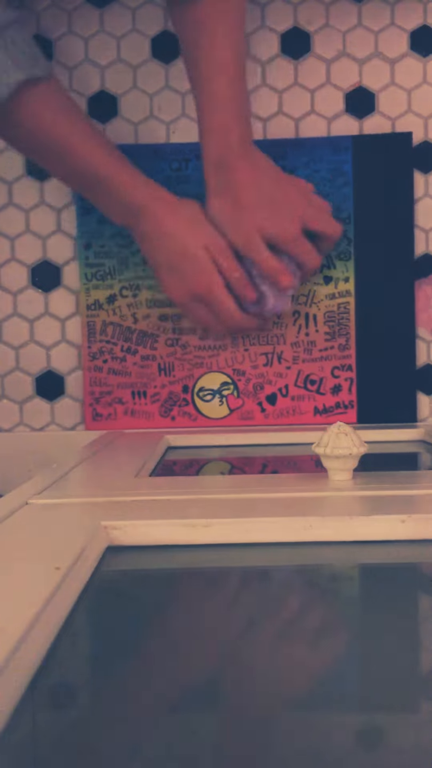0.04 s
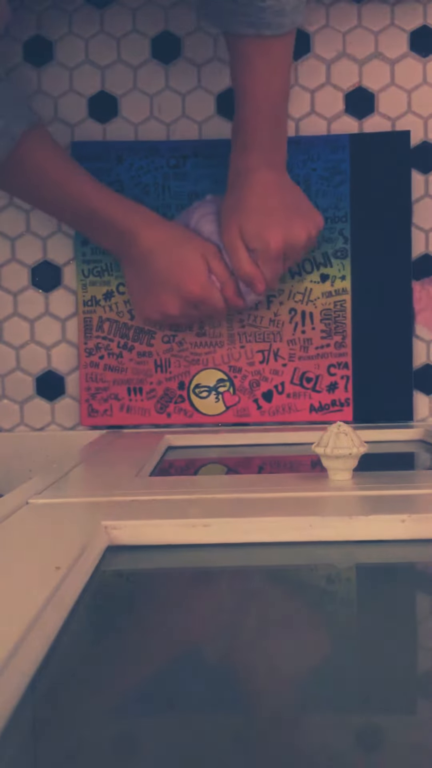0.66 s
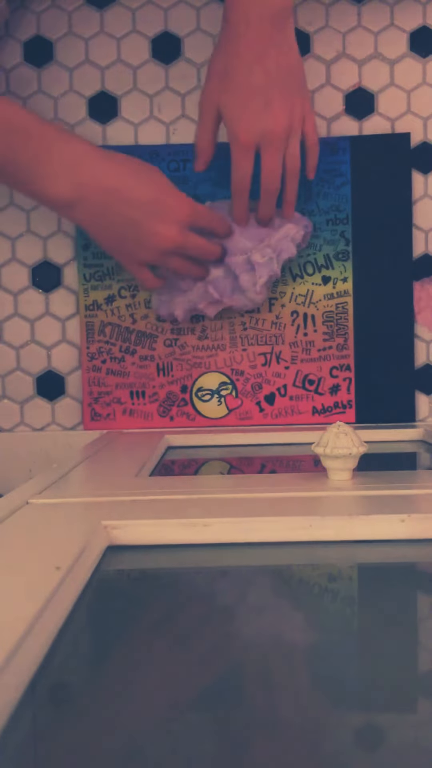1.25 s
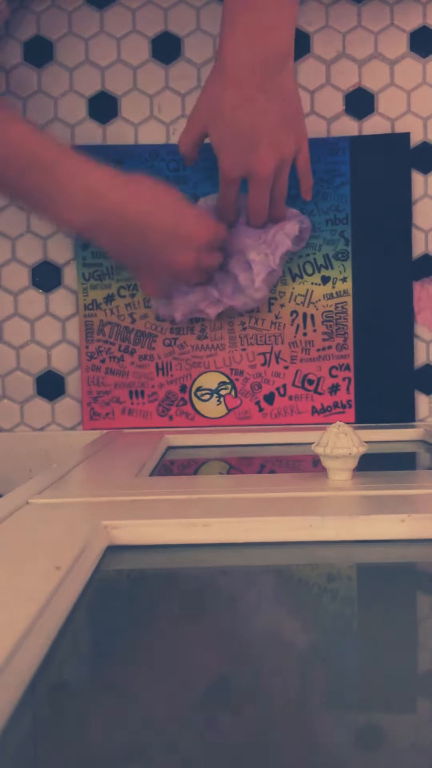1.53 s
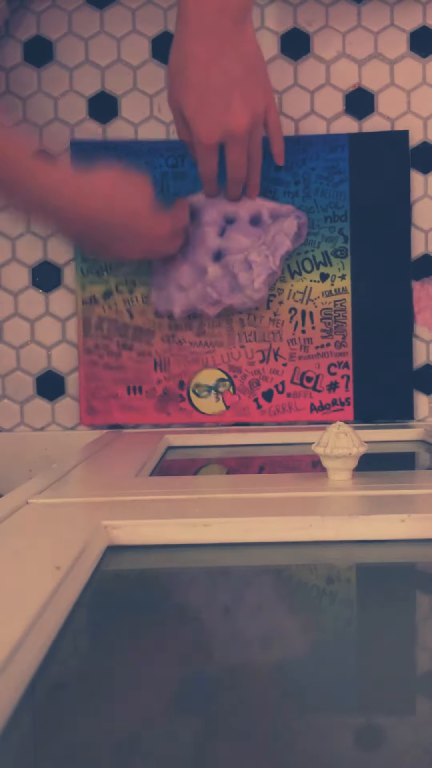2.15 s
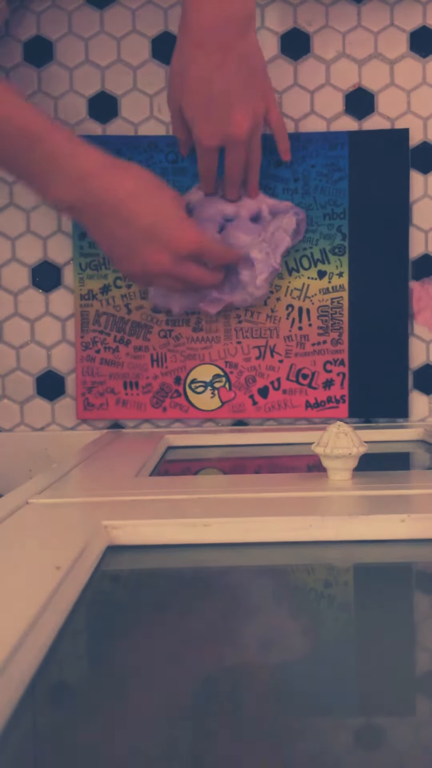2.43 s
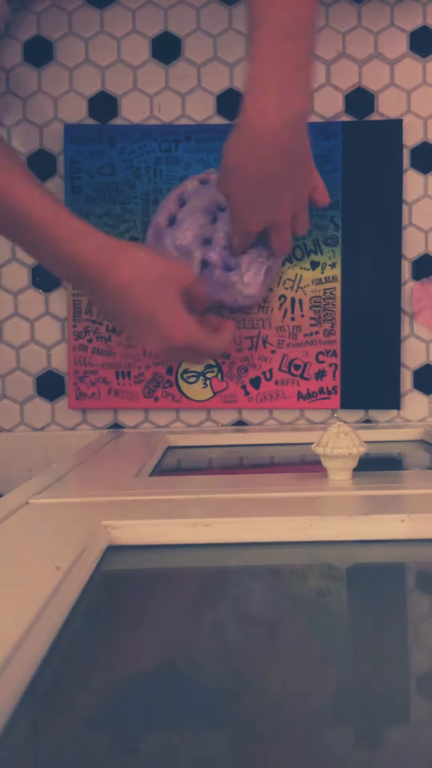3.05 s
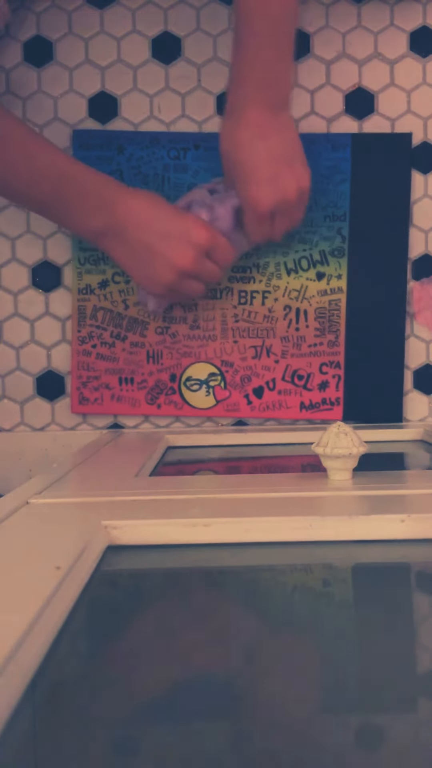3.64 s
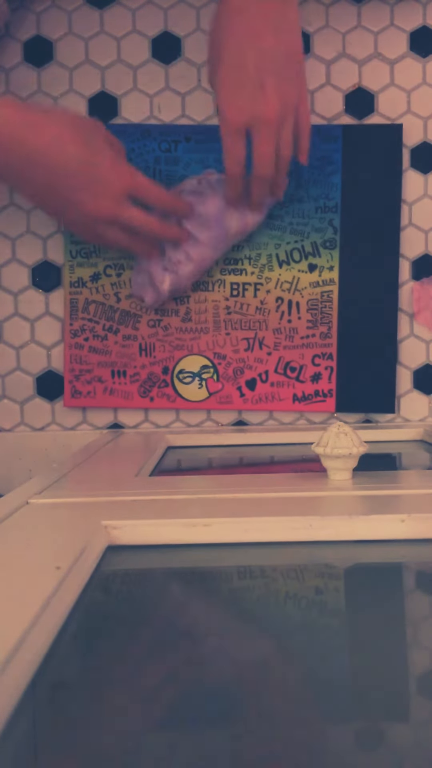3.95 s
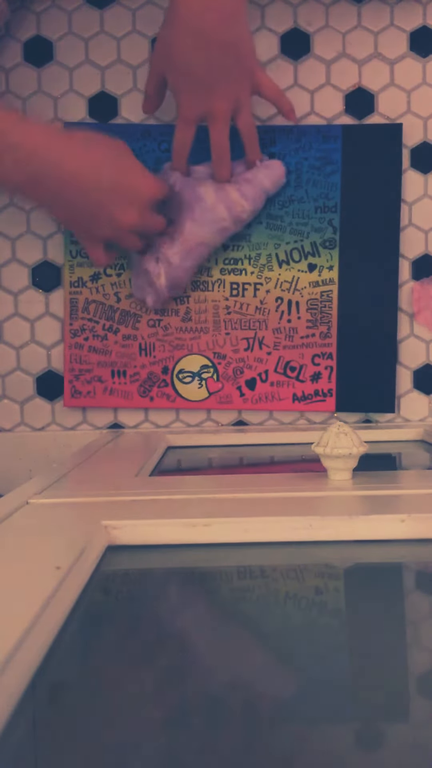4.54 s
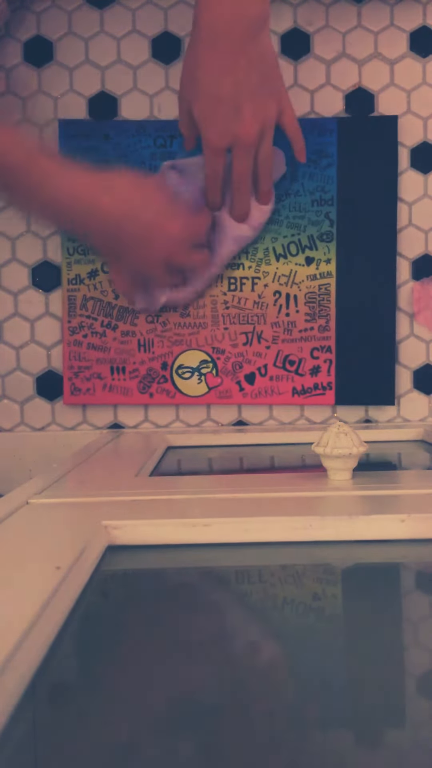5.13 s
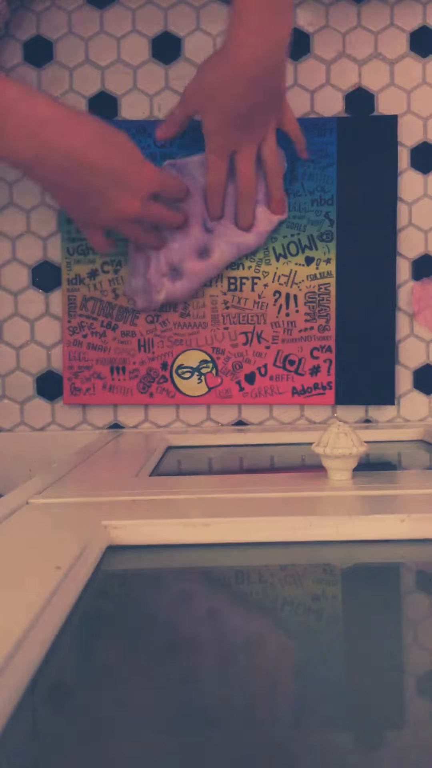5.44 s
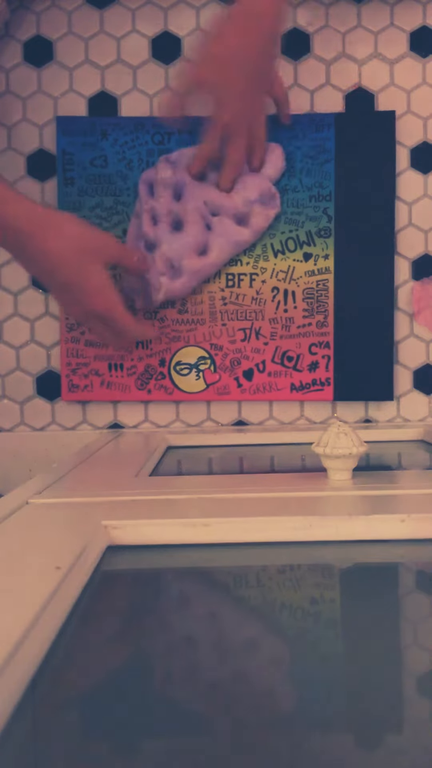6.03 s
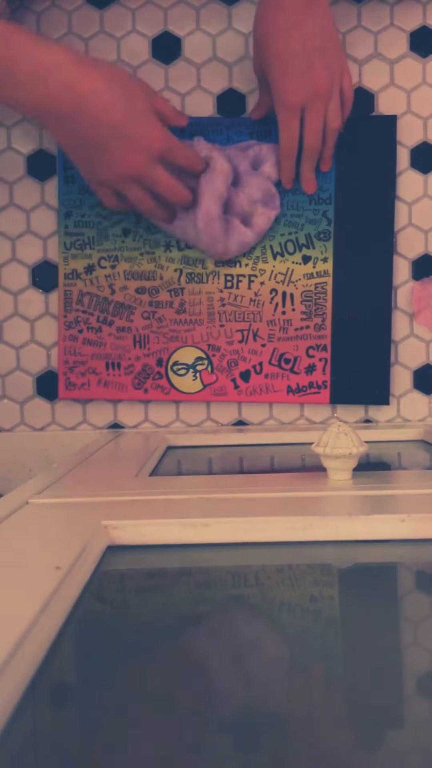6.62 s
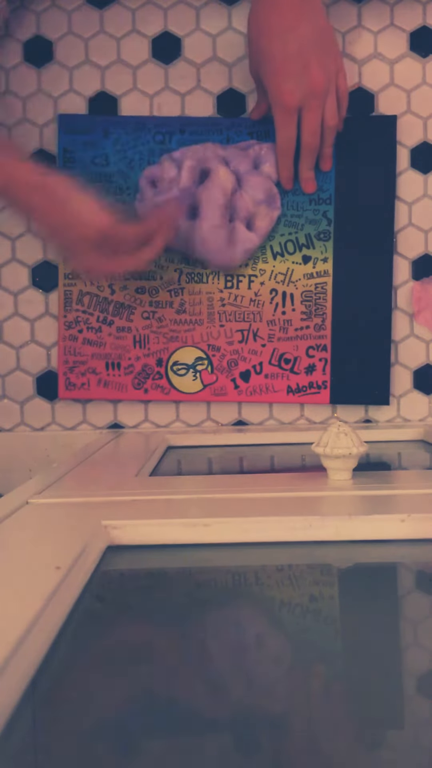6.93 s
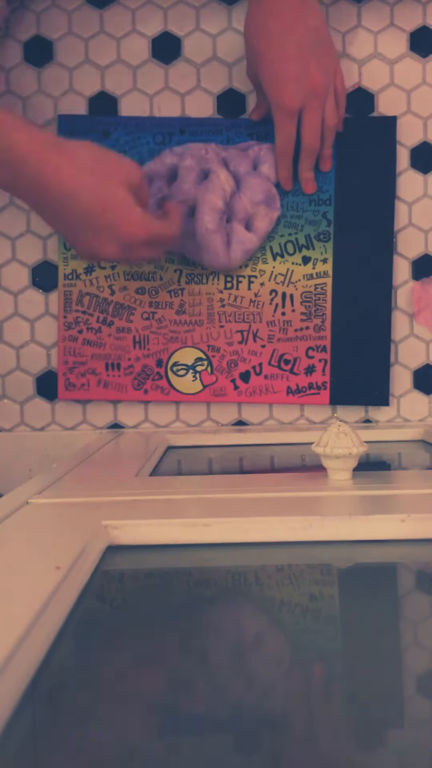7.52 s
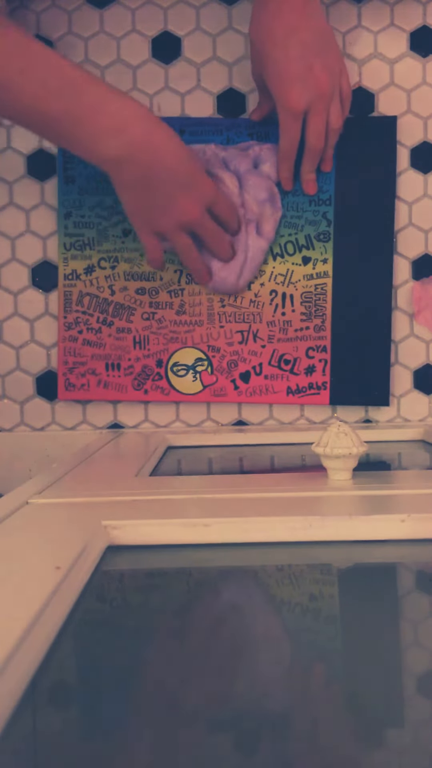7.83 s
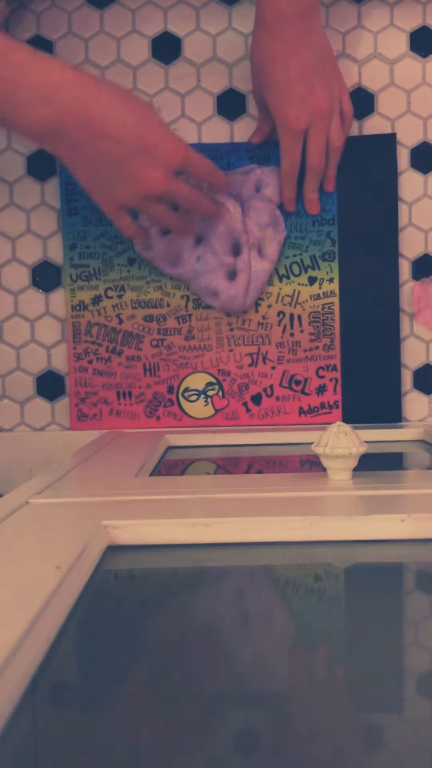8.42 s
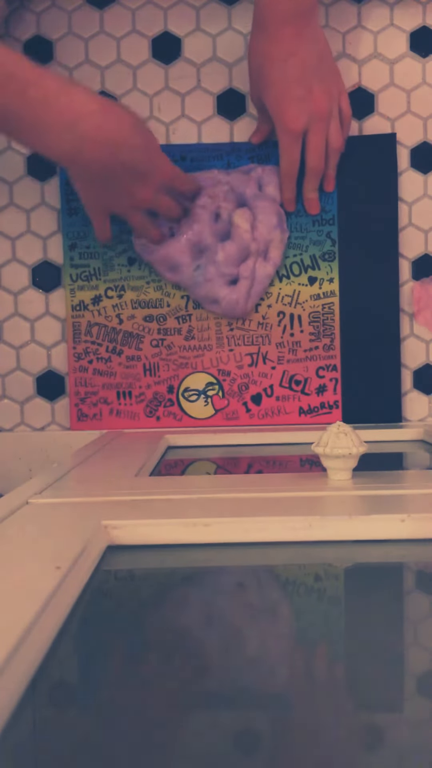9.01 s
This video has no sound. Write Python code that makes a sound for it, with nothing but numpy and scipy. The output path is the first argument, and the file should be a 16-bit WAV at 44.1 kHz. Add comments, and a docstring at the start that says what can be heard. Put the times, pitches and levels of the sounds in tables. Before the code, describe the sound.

Hands work soft slime on a board in a small room, heard through one microphone with tight reflections and faint room tone. Soft gulps and pops open, then a cluster of sharp wet snaps and sticky fizz runs from 0.5 to 0.8 seconds. At about 1 second, hands and slime land on the board with a dull thud, the loudest sound. From 1.4 to 3.5 seconds, air pockets pop and finger holes gulp irregularly among squelchy snaps. A faint crackle and a soft bump follow near 3.7 seconds. Pops and snaps resume, a few each second, from 4.3 to 6.3 seconds, then thin out briefly, with scattered ones near 7, 7.6 and 8 seconds. A second thud comes at 8.5 seconds, followed by wet snaps around 8.9 and a last pop and gulp at 9.2 seconds.

```python
"""Soft slime, squeezed, folded and poked by two hands on a board on the tiled floor of a small room.
Air pockets pop and finger holes gulp as fingers go in and out; the sticky skin crackles under them
and tears with wet snaps, and hands and slime thud on the board.
One microphone takes it all in, with walls close enough to answer within milliseconds
and faint room tone underneath."""
import sys
import numpy as np
from scipy import signal
from scipy.fft import rfft, irfft, next_fast_len
from scipy.io import wavfile
from scipy.ndimage import map_coordinates

SR = 44100
rng = np.random.default_rng(int(sys.argv[2]) if len(sys.argv) > 2 else 0)


def unload_wav(signal):
    """Save mono or channel-first audio to the path in sys.argv[1] as 16-bit WAV at rate SR, clipped to [-1, 1]."""
    wavfile.write(
        sys.argv[1],
        SR,
        np.round(np.clip(np.atleast_2d(signal).T, -1, 1) * 32767).astype(np.int16),
    )


N = 408807

# Wet skin tearing: (time [s], crack level [dB], crack pitch [Hz], fizz level [dB], air pocket level [dB])
SNAPS = [(0.5075, -32.5, 2780, -44.5, -46.5), (0.6407, -37, 3600, -36.5, -72),
         (0.667, -34, 3750, -41, -56.5), (0.7063, -51, 3000, -33.5, -60), (0.811, -65, 3400, -51, -100),
         (1.011, -42, 1560, -61, -40), (1.6236, -40, 4000, -37, -49.5), (1.6504, -41.5, 3270, -41, -46.5),
         (1.9333, -45, 4070, -48.5, -41), (2.272, -58, 5100, -49, -53), (2.314, -52, 4160, -59, -42.5),
         (2.645, -54, 1460, -44.5, -57), (2.681, -47.5, 2230, -49.5, -47),
         (2.9261, -47.5, 1690, -47.5, -52), (2.937, -43, 1840, -63, -44.5),
         (3.249, -44.5, 2120, -42.5, -45.5), (3.952, -57, 1540, -62.5, -58),
         (4.3074, -53, 3920, -48, -52.5), (4.658, -45.5, 3130, -44.5, -42.5),
         (4.695, -46.5, 2400, -44, -47), (4.948, -46, 2100, -50.5, -44), (5.258, -44.5, 4700, -38, -46.5),
         (5.614, -44, 2320, -40, -47), (5.8708, -47.5, 2970, -40, -48.5), (5.898, -41, 2650, -40.5, -37.5),
         (6.1892, -45.5, 1600, -54.5, -45.5), (6.2129, -52.5, 1990, -41.5, -46),
         (6.324, -66, 3240, -59, -50.5), (7.019, -52, 1820, -52.5, -47), (7.0474, -48, 3070, -58, -40),
         (7.555, -63.5, 2660, -55.5, -55.5), (7.587, -44, 3870, -46.5, -42), (8.0785, -44, 1500, -48, -44),
         (8.096, -46.5, 1460, -50.5, -42.5), (8.68, -62.5, 4860, -47.5, -62),
         (8.7052, -77, 4400, -44.5, -63), (8.856, -44.5, 2120, -42.5, -48.5),
         (8.882, -36.5, 1600, -42, -37)]
LEAD = SR // 50  # samples before each contact
AGE = np.arange(-LEAD, SR // 6) / SR  # time since the contact [s]
DELAY = np.arange(SR // 4) / SR  # time since the direct sound [s]
POCKET_HZ, HOLLOW_HZ = 786, 330  # usual pitch of an air pocket and of a finger hole


def amp(db):
    """Decibels to gain."""
    return 10 ** (np.asarray(db) / 20)


def unit(x):
    """x at rms 1."""
    return x / np.sqrt(np.mean(x ** 2) + 1e-20)


def along(points, hz):
    """(frequency [Hz], value) points joined on a log axis and read at hz."""
    freqs, values = np.transpose(points)
    return np.interp(np.log(hz + 1), np.log(freqs + 1), values)


def filtered(x, response):
    """x shaped by a gain that is a function of frequency."""
    size = next_fast_len(N + SR // 2)
    return irfft(rfft(x, size) * response(np.fft.rfftfreq(size, 1 / SR)), size)[:N]


def band(x, lo_hz, hi_hz, order=2):
    """Causal band-pass."""
    edges = np.clip([lo_hz, max(hi_hz, lo_hz + 20)], 10, SR / 2 - 500)
    return signal.sosfilt(signal.butter(order, edges, "bandpass", fs=SR, output="sos"), x)


def around(x, hz, width, order=2):
    """Band-pass from hz / width to hz * width."""
    return band(x, hz / width, hz * width, order=order)


def standing_waves():
    """Impulse response of the narrow room's resonances, each in phase with the direct sound at its peak."""
    # Room modes: (frequency [Hz], peak over the direct sound [dB], t60 [s])
    modes = [(129.1, 11.5, 0.17), (325, 2, 0.16), (403.7, 7.5, 0.25), (519, -2, 0.17), (611, 9.5, 0.12),
             (716.6, 11, 0.097), (836, 6, 0.069), (976, 11.5, 0.083), (1103, 11, 0.14), (1510, 11, 0.018),
             (3180, -10, 0.21), (3700, -3.5, 0.41)]
    waves = np.zeros(len(DELAY))
    for hz, db, t60 in modes:
        rate = np.log(1000) / t60
        waves += amp(db) * np.exp(-rate * DELAY) * np.cos(2 * np.pi * hz * DELAY) * 2 * rate / SR
    return waves


def room(waves, tail_db, build_s=0.0013):
    """The path to the microphone: direct sound, near walls, standing waves and a diffuse tail."""
    # Reflections off the floor and near walls: (delay [s], level [dB])
    walls = [(.00122, -14.5), (.00265, -11), (.0054, -7), (.0077, -11), (.0093, -12.5), (0.0114, -10)]
    # Decay of the tail, longest in the bass: (frequency [Hz], t60 [s])
    decay_times = [(100, 0.34), (260, 0.15), (700, 0.12), (2000, 0.098), (5000, 0.12), (13000, 0.054)]
    hz, t, spectrum = signal.stft(rng.standard_normal(len(DELAY)), SR, nperseg=512)
    decay = amp(-60 * t / along(decay_times, hz)[:, None])
    tail = signal.istft(spectrum * decay, SR, nperseg=512)[1][:len(DELAY)]
    tail *= 1 - np.exp(-DELAY / build_s)
    echo = waves + amp(tail_db) * unit(tail) / np.sqrt(len(tail))
    echo[0] += 1  # direct sound
    for delay, db in walls:
        path_s = delay * np.exp(rng.normal(0, .04))  # the hands move, so the paths vary
        echo[round(path_s * SR)] += amp(db)
    return echo


def add(track, s, db, sound, echo, level_s=.02):
    """Put a sound into the room at time s; db is its energy at the microphone as an rms over level_s."""
    wet = signal.fftconvolve(sound, echo)
    start = max(round(s * SR), 0)
    track[start:start + len(wet)] += amp(db) * unit(wet) * np.sqrt(level_s * SR / len(wet))


def room_tone():
    """Still room air and hiss; the low rumble swells and sinks slowly."""
    # Spectrum of the quiet room: (frequency [Hz], relative density [dB])
    spectrum = [(15, -44), (25, -16), (55, -0.5), (97, -10.5), (170, 0), (195, -10.5), (335, -13.5),
                (489, -19), (545, -15), (775, -18), (1370, -21), (2220, -22), (2410, -23.5), (6920, -26.5),
                (16000, -37)]
    air = unit(filtered(rng.standard_normal(N), lambda hz: amp(along(spectrum, hz))))
    rumble = filtered(air, lambda hz: 1 / (1 + (hz / 260) ** 4))
    knots = np.arange(N) * 9 / SR  # nine random levels a second
    drift = map_coordinates(rng.standard_normal(int(knots[-1]) + 4), [knots])
    return amp(-67.4) * (air - rumble + rumble * amp(3.2 * drift - 1.5))


def pocket(hz, cycles, sag, sag_s=0.0016, opening_cycles=0.2):
    """An air cavity in soft walls: it opens and rings briefly while its pitch sags."""
    t = np.maximum(AGE, 0)
    pitch = hz * np.exp(sag * (np.exp(-t / sag_s) - .5)) * (AGE > 0)
    envelope = np.exp(-t * hz / cycles) * (1 - np.exp(-t * hz / opening_cycles))
    return envelope * np.sin(2 * np.pi * np.cumsum(pitch) / SR)


def hollow(hz):
    """A finger hole widens, so its low note slides down."""
    return band(pocket(hz, cycles=0.93, sag=0.36, sag_s=0.0042), 138, 840, order=3)


def gulps(waves, recoil_hz=157.7, recoil_after_s=0.01083):
    """A deep hole sounds its hollow note, then the soft mass recoils round it, lower in pitch."""
    # Deep finger holes widening: (time [s], hollow level [dB], recoil level [dB])
    holes = [(0.031, -53, -49.5), (0.506, -44.5, -64), (0.668, -56, -72), (1.654, -45.5, -47),
             (1.943, -67, -50), (2.924, -61, -45.5), (3.285, -59, -48), (3.436, -70.5, -50),
             (3.47, -51.5, -60), (4.697, -47, -43.5), (4.952, -51, -58), (5.626, -57, -53),
             (5.912, -49, -44), (6.199, -50, -56), (7.02, -50, -58.5), (7.043, -47, -53.5),
             (7.581, -52, -46), (8.08, -48, -50), (8.735, -54, -49.5), (8.888, -51, -41.5),
             (9.209, -48.5, -45.5)]
    track = np.zeros(N + SR)
    for s, hollow_db, recoil_db in holes:
        echo = room(waves, tail_db=-2)
        add(track, s, hollow_db, hollow(HOLLOW_HZ), echo)
        add(track, s + recoil_after_s, recoil_db, hollow(recoil_hz), echo)
    return track[LEAD:][:N]


def tearing(tear_s, rise=0.14, spiky=1.13, strain_db=-20, strain_s=.004):
    """A quick run of tiny ruptures of very uneven size, amid the fine crackle of strained skin."""
    swell = np.exp(-np.abs(AGE) / np.where(AGE < 0, rise * tear_s, tear_s))
    sizes = np.exp(spiky * np.clip(rng.standard_normal(len(AGE)), -2, 2))
    ruptures = swell * unit(sizes * rng.standard_normal(len(AGE)))
    ruptures[LEAD] += 4  # the main rupture dominates a quick tear and is lost in a slow one
    strain = amp(strain_db) * np.exp(-np.abs(AGE) / strain_s) * rng.standard_normal(len(AGE))
    return ruptures + strain


def pops(waves):
    """A pocket opens with a dull click and rings briefly over the hollow note of its hole."""
    # Air pockets opening round a finger: (time [s], ring level [dB], pitch [Hz])
    openings = [(0.035, -50, 678), (0.245, -56.5, 715), (0.471, -45.5, 840), (1.4324, -46, 820),
                (1.9243, -41, 1090), (2.657, -42, 960), (2.729, -46, 870), (2.888, -42, 1240),
                (3.035, -49, 750), (3.435, -56.5, 850), (3.471, -50, 670), (4.529, -47.5, 875),
                (4.94, -43.5, 1120), (5.0966, -46.5, 830), (5.279, -43.5, 766), (5.61, -46.5, 1090),
                (6.8543, -46.5, 865), (7.582, -44.5, 1020), (7.905, -47, 886), (8.066, -54.5, 1240),
                (8.735, -47.5, 856), (9.209, -47.5, 850)]
    track = np.zeros(N + SR)
    for s, ring_db, hz in openings:
        echo = room(waves, tail_db=3)
        slowness = (POCKET_HZ / hz) ** 8.1  # larger pockets open more slowly
        click_db = ring_db - 9.5 + 10 * np.log2(hz / POCKET_HZ)  # smaller ones click harder
        ring = pocket(hz, cycles=1.54, sag=0.034, opening_cycles=0.21 * slowness)
        click = tearing(tear_s=0.00079 * slowness, strain_db=-11.5)
        add(track, s, ring_db, band(ring, 300, 1270), echo)
        add(track, s, click_db, band(click, 785, 2660, order=3), echo)
        add(track, s, ring_db - 9, hollow(HOLLOW_HZ), echo)
    return track[LEAD:][:N]


def rubs(waves):
    """Sliding fingers stick and let go in a faint, fine crackle."""
    # Fingers sliding on or peeling off the slime: (time [s], level [dB], colour [Hz], fading time [s])
    strokes = [(0.157, -63.5, 1010, 0.055), (.292, -65.5, 6700, 0.021), (0.486, -53.5, 7200, 0.0067),
               (0.548, -50.5, 3950, 0.0092), (.586, -51.5, 4200, 0.00097), (.692, -48, 7600, 0.0071),
               (0.759, -54.5, 7900, 0.036), (0.962, -54.5, 2500, 0.009), (0.995, -47.5, 1390, 0.045),
               (2.158, -69.5, 990, 0.016), (2.372, -62, 12000, 0.0046), (3.475, -64.5, 7260, 0.02),
               (3.559, -65.5, 1560, 0.062), (3.661, -58.5, 2040, 0.23), (3.703, -61, 7000, 0.0033),
               (3.932, -53.5, 1760, 0.025), (6.382, -62.5, 3030, 0.011), (6.526, -66, 990, 0.016),
               (7.311, -69.5, 6100, .005), (7.844, -63, 1570, .002), (8.255, -61.5, 1460, 0.071)]
    track = np.zeros(N + SR)
    for s, db, hz, fade_s in strokes:
        crackle = around(tearing(fade_s, rise=0.55, spiky=0.58), hz, width=1.85, order=1)
        add(track, s, db, crackle, room(waves, tail_db=-7))
    return track[LEAD:][:N]


def snaps(waves, usual_crack_hz=2660):
    """The skin tears in a crack and a fizz and lets out the air behind it with a squelch."""
    track = np.zeros(N + SR)
    for s, crack_db, crack_hz, fizz_db, pocket_db in SNAPS:
        thickness = np.log2(usual_crack_hz / crack_hz)  # thicker skin cracks lower [octaves]
        air_db = pocket_db - max(crack_db, fizz_db)
        tear_s = 0.0021 * 2 ** (0.0364 * air_db + 0.7 * thickness)  # more air or thicker skin: slower
        # Skin that fizzes more than it cracks also fizzes higher.
        fizz_hz = 7500 * 2 ** (.028 * (fizz_db - crack_db) + 0.27 * thickness)
        pocket_hz = POCKET_HZ * 2 ** (.3 * thickness) * np.exp(0.1 * rng.standard_normal())
        echo = room(waves, tail_db=3)
        tear = tearing(tear_s, strain_db=-17.5)
        bubble = unit(pocket(crack_hz, cycles=0.83, sag=0.35))
        crack = unit(around(tear, crack_hz, width=1.66)) + amp(-4) * bubble
        fizz = unit(around(tear, fizz_hz, width=1.593)) + amp(-2.5) * unit(band(tear, 10440, 17500))
        squelch = unit(pocket(pocket_hz, cycles=1.8, sag=0.46)) + amp(-0.5) * unit(band(tear, 354, 790))
        early_s = .005 * rng.uniform(0.473, 1)
        first_rupture = around(tearing(tear_s=0.00043), 1700, width=2.5)
        add(track, s - early_s, min(crack_db, pocket_db) - 8, first_rupture, echo)
        add(track, s, crack_db, crack, echo)
        add(track, s, fizz_db, fizz, echo)
        add(track, s + 0.00198, pocket_db, squelch, echo)
        add(track, s, pocket_db - 20.5, hollow(HOLLOW_HZ), echo)
    return track[LEAD:][:N]


def threads(waves, count=3, within_s=0.037):
    """After each snap a few sticky threads part in faint ticks."""
    track = np.zeros(N + SR)
    for s, crack_db, _, fizz_db, _ in SNAPS:
        echo = room(waves, tail_db=4.5)
        for late_s in within_s * rng.random(count):
            tick = around(tearing(tear_s=0.0015), hz=5940, width=4.9)
            add(track, s + late_s, max(crack_db, fizz_db) - 21.5, tick, echo)
    return track[LEAD:][:N]


def ringing(modes, scatter_db):
    """Struck modes die away from the moment of contact, each a little louder or softer every time."""
    t = AGE[LEAD:]
    return sum(amp(db + rng.normal(0, scatter_db) - 60 * t / t60) * np.sin(2 * np.pi * hz * t)
               for hz, db, t60 in modes)


def thuds(waves):
    """Each landing slaps and rings the board; a soft contact reaches only its lowest modes."""
    # Hands and slime landing on the board: (time [s], level [dB], hardness of the contact [Hz])
    landings = [(1.027, -37, 266), (1.0401, -23.5, 765), (3.753, -42, 296), (8.489, -40.5, 440),
                (8.525, -30.5, 694)]
    # Modes of the board on the floor: (frequency [Hz], relative level [dB], t60 [s])
    board_modes = [(129, -24, 0.56), (205, -11.5, 0.23), (250.3, 7, 0.05), (286, -4.5, 0.053),
                   (422, 0, 0.024), (510, 5.5, 0.025), (810, -2, 0.025), (1570, -30, 0.047)]
    track = np.zeros(N + SR)
    for s, db, hard_hz in landings:
        ring = np.pad(ringing(board_modes, scatter_db=2.1), (LEAD, 0))
        echo = room(waves, tail_db=-0.5)
        slap = tearing(tear_s=0.0061, spiky=1.0)
        add(track, s, db, band(ring, 145, hard_hz, order=3), echo)
        add(track, s, db - 28, band(slap, 600, 2.85 * hard_hz, order=3), echo)
    return track[LEAD:][:N]


def scene():
    """Slime, board and room as they reach the one microphone."""
    waves = standing_waves()
    slime = snaps(waves) + threads(waves) + pops(waves) + gulps(waves)
    return (slime + thuds(waves) + rubs(waves) + room_tone())[None]


def record(dry):
    """The microphone drops the deepest bass, and the recorder rolls off the treble at its band limit."""
    low_cut_hz, top_hz, roll_off_hz = 32, 16400, 1200
    mic = signal.sosfilt(signal.butter(2, low_cut_hz, "highpass", fs=SR, output="sos"), dry[0])
    return filtered(mic, lambda hz: np.clip((top_hz - hz) / roll_off_hz, 0, 1))[None]


dry = scene()
out = record(dry)
unload_wav(out)
```